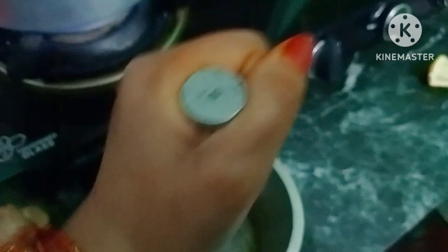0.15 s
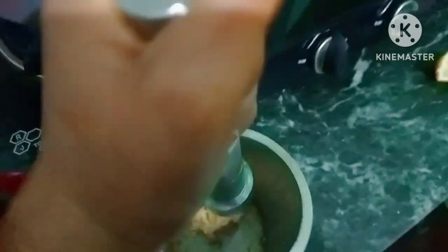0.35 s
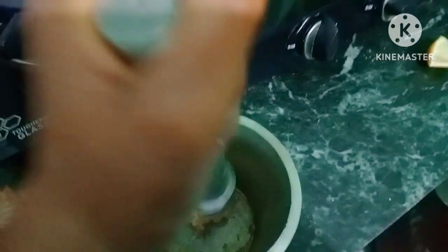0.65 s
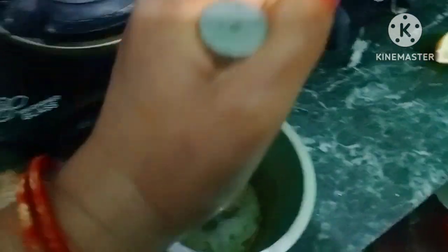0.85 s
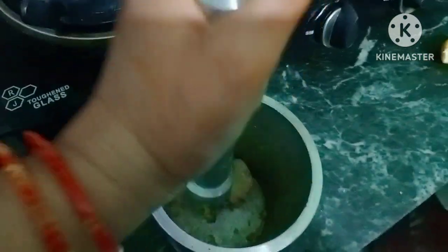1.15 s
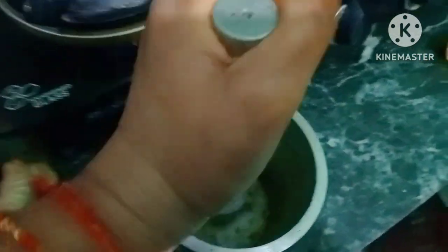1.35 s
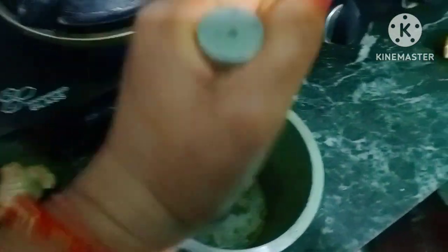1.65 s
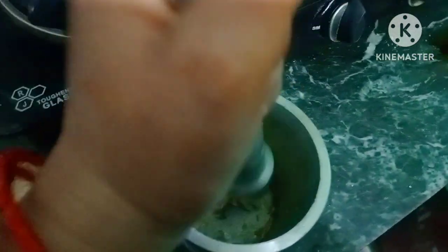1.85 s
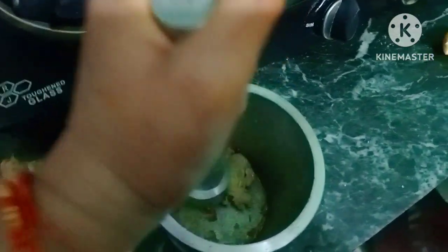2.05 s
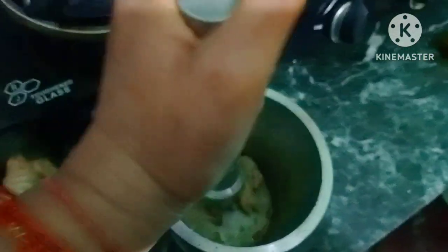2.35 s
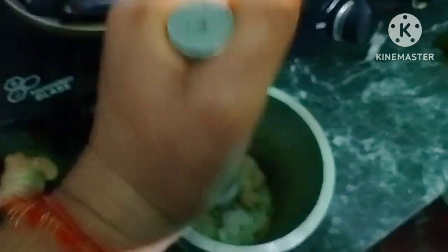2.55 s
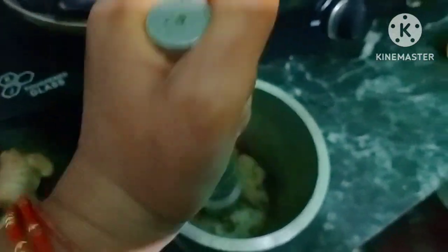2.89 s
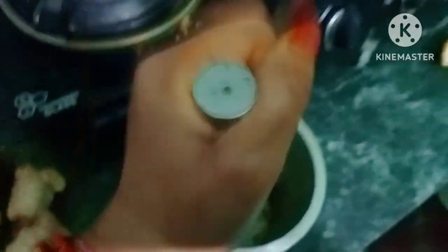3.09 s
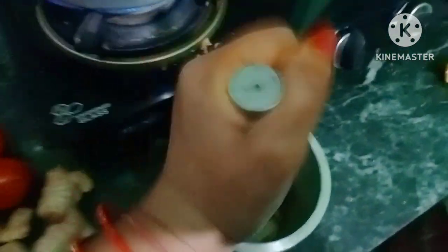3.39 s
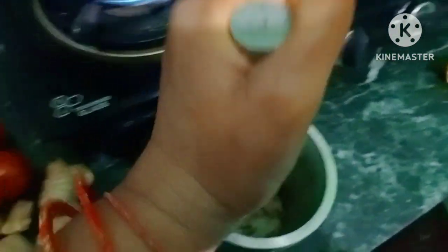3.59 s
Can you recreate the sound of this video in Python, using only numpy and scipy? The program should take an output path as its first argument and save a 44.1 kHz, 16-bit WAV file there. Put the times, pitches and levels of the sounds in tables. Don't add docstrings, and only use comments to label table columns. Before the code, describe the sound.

A metal pestle pounds ginger in a metal mortar on a stone counter, evenly about three times a second; the first blows are heaviest, later ones sharper. Glass bangles clink; small hard kitchen, close phone microphone.

```python
import sys
import numpy as np
from scipy import signal
from scipy.io import wavfile
from scipy.ndimage import uniform_filter1d

SR = 44100
rng = np.random.default_rng(int(sys.argv[2]) if len(sys.argv) > 2 else 0)


def voltage_ratio(level):
    return 10 ** (np.asarray(level, float) / 20)


def to_wav(sig):
    pcm = np.clip(np.atleast_2d(sig), -1, 1) * 32767
    pcm = np.round(pcm).astype(np.int16)
    wavfile.write(sys.argv[1], SR, pcm.T)


N = 165375
PAD = 8820
TOTAL = N + PAD

# f/Hz, density/dB
AIR_COLOUR = [(50, -3.5), (80, 8), (130, -0.5), (200, 0.5), (300, 6.5), (2000, -6), (5000, -18),
              (16000, -24.5)]
# middle/dB, upper/dB, lowest modes/dB
CLINKS = [(0.0024, -32, -40.5, -52, -56), (0.0295, -38, -51, -58, -64), (0.054, -39, -50, -62.5, -56),
          (0.253, 2, -15.5, -17.5, -31.5), (0.2893, -26, -32, -43.5, -37), (0.4034, -24, -38, -36, -39),
          (0.5263, -20, -17.5, -35, -38), (0.559, -24, -51, -51, -37), (0.7062, -47, -57, -71, -57),
          (0.7674, -17, -43, -44, -47), (0.849, -37, -44, -49, -54), (1.05, -34, -49, -58, -49),
          (1.061, -28, -27.5, -34.5, -51), (1.455, -36, -42, -51, -44), (1.735, -34, -34, -48, -42),
          (1.753, -31, -39.5, -50, -43), (1.7938, -40, -44.5, -67, -37), (2.0335, -38, -43, -56, -48),
          (2.2163, -21, -30.5, -38, -53), (2.2657, -32, -42, -64, -69), (2.528, -36, -44.5, -62, -64),
          (2.6413, -29, -38, -40, -44), (2.9471, -34, -46.5, -50, -48), (3.032, -27, -33, -39, -60)]
# lower mode/dB, upper modes/dB, then share of the free ringing length for both
NARROW_RING = [(-61, -57.5, .9), (-60.5, -64, .9), (-51, -53, 0.81), (-32, -24.5, 1), (-48.5, -52.5, 0.74),
               (-35.5, -51, 0.92), (-37, -46, 0.67), (-30, -41, 1), (-56, -64, 0.97), (-45, -57, 0.88),
               (-49, -60, 0.62), (-40.5, -52, .9), (-43, -51, 0.42), (-37.5, -63, 0.55), (-56, -64, 1),
               (-51, -54.5, 1), (-58, -70, 1), (-43, -63, 0.76), (-39.5, -48, 1), (-60, -69, .9),
               (-48.5, -72, 0.71), (-66, -58, .9), (-50, -58, 0.98), (-52, -47, 0.42)]
WIDE_BANGLE_HZ = [4440, 4592, 8505, 8538, 8724, 13580, 13665]
# level/dB, time to fall 60 dB/s
WIDE_BANGLE = [(3.5, 0.2), (3, 0.15), (-2, 0.095), (-4, 0.074), (-17, 0.062), (-15, 0.08), (4, 0.075)]
NARROW_BANGLE_HZ = [7296, 11710, 11745]
# level/dB, time to fall 60 dB/s
NARROW_BANGLE = [(1.5, 0.12), (-1.5, 0.077), (-17, 0.1)]
# t/s, length/s, f/Hz, width/Hz, level/dB
RUBS = [
    (1.757, 0.29, 620, 464, -43.5),
    (2.139, 0.22, 800, 79.5, -46),
    (2.147, 0.24, 363, 248, -45),
    (2.205, 0.12, 1050, 30, -48.5),
    (2.617, 0.19, 2070, 25, -37),
    (2.97, 0.18, 1865, 24.5, -42),
    (3.284, 0.0036, 5000, 3000, -42),
    (3.439, .13, 4576, 24.8, -47.5),
    (3.5, 0.095, 1880, 30, -37),
]
# t/s, time to fall 60 dB/s, f/Hz, width/Hz, level/dB
AFTER_RINGS = [(.203, 0.55, 931, 40, -29.5), (.403, 0.095, 3835, 40, -44), (.512, 0.54, 1250, 70, -26),
               (.79, 0.21, 1250, 70, -23), (.793, 0.28, 8000, 1500, -41.5), (1.095, .45, 2060, 55, -29.5),
               (1.097, .25, 2300, 90, -26), (1.095, .45, 2870, 130, -35), (1.1, 0.36, 3800, 300, -38.5),
               (1.397, 0.45, 4140, 2000, -34.5), (1.712, 0.57, 4020, 2180, -33.5),
               (2.92, 0.21, 4300, 90, -35), (3.18, 0.44, 5600, 40, -47), (3.18, 0.22, 4600, 30, -56),
               (3.447, 0.36, 7950, 90, -52.5), (.205, 0.32, 1030, 216, -43), (.512, .3, 5200, 80, -41),
               (2.015, 0.29, 2890, 682, -29), (2.316, .3, 2050, 55.6, -36), (2.914, 0.4, 83, 37.04, -30),
               (3.18, 0.38, 144, 24, -25.5), (3.18, .3, 1898, 40, -34)]
# f/Hz, density/dB
TAIL_COLOUR = [(200, -5), (250, -7.5), (400, -4), (800, -7), (2000, -15.5), (4500, -30), (8000, -30),
               (16000, -31)]
# f/Hz, time to fall 60 dB/s
ROOM_T60 = [(200, 0.43), (600, 0.52), (2000, 0.54), (5000, 0.45), (7000, 0.38), (15000, 0.12)]
SPRAY_DB = [-0.5, 1.3, 0, 2.3, 0.8, -6.5, -3.5, 0, 1, 1.5, 4.5, 3.5, 0.5, 0.8]
# f/Hz, level/dB, time to fall 60 dB/s
COUNTER = [(80.8, -13, 0.69), (110.1, -8, 0.44), (127.6, -6, 0.63), (146.9, 1.5, 0.4), (186.3, 0.5, 0.56),
           (201.5, -4.5, 0.67), (277, -8, 0.42), (318, -2.5, 0.39), (358, -6, 0.37), (417, -11, 0.45)]
# f/Hz, level/dB, time to fall 60 dB/s
MORTAR = [(620, -9.5, 0.33), (717, 1, 0.081), (780, 7, 0.032), (949, -8, 0.24), (1038, -4, 0.14),
          (1270, -2, 0.18), (1585, -3, .12), (1880, -7, 0.29), (2030, -7, 0.25), (2157, -0.5, 0.052)]
# multiple of snap pitch, level/dB, time to fall 60 dB/s
SNAP = [(.64, -8.5, 0.026), (.85, -23, 0.015), (1.0, -0.5, 0.018), (1.12, 1, 0.0041)]
# f/Hz, density/dB
SQUELCH_COLOUR = [(1760, -33), (3000, -30), (3520, -18), (4500, 7), (5600, -2.5), (8400, -8), (9940, -35),
                  (14300, 8), (16000, -30)]
# t/s, squelch/dB, snap/dB, knock/dB, thud/dB
BLOWS = [(0.1994, -6.5, -34, -8, -12), (0.5083, -3, -34.5, -9, -12), (0.7869, -6, -63, -19, -31),
         (1.0914, -3, -17.5, -22, -24.5), (1.3939, -13.5, -17.5, -26, -27),
         (1.709, -15, -14.5, -29.5, -27.5), (2.012, -7.5, -18.5, -25.5, -30.5),
         (2.3143, -7.5, -25, -21.5, -26), (2.6184, -6, -19, -18, -17.5), (2.9112, -11.5, -27, -22.5, -23.5),
         (3.1751, -14.5, -57.5, -21.5, -29), (3.444, -21, -25.5, -20.5, -32),
         (3.7454, -12, -38, -28, -25.5)]
# squelch/dB, snap/dB, knock/dB, thud/dB
EARLIER_BLOW = (-30.5, -27, -20, -26.5)
# snap pitch f/Hz, snap echo/dB, knock tilt and thud tilt/dB per octave
LANDINGS = [(3100, -7.5, -4, -6.5), (3170, -19, 2, 3), (3350, 3, 2.5, 4), (4030, 12.5, -3, 0),
            (2780, -8.5, -5, -2), (4360, 0.5, -2, -4.5), (4590, 5.5, -7, -2), (2700, 2, -3.5, 1.5),
            (4470, 3.5, 6.5, -7), (4250, -2, 2, 2.5), (4020, 3, -3, 5.5), (3860, 16, -1.5, -5.5),
            (2420, -14.5, 2.5, 3.5), (4030, 22.5, -1, -3)]
# f/Hz, width/Hz, level/dB
MIC = [(1332, 378, -6), (5650, 1300, -9), (8270, 1300, 6), (10300, 1100, -5), (14000, 2400, -0.5)]

AIR_DB = -51.5
EARLIER_S = -0.1
SNAP_LAG_S, KNOCK_LAG_S, THUD_LAG_S = 0.00077, 0.00213, 0.00363
SNAP_DB, KNOCK_DB, THUD_DB, BANGLE_DB = 10, -5, -3.5, -0.5
MODE_SPREAD_DB, DAMPING_SPREAD = 3.5, 0.14
TWIN_DB = -8
SQUELCH_RISE_S, SQUELCH_FALL_S, SQUELCH_LEAD_S = 0.0016, 0.0027, 0.0045
SQUELCH_DB, GRAIN_DB = -4.5, 5.5
CRACK_DB, CRACK_S = -6, 0.00031
CRUNCH_DB, CRUNCH_S, CRUNCH_PER_S = -3, 0.045, 5000
TAIL_DB, TAIL_RISE_S, TAIL_PATCHY_DB, SPRAY_GRAIN_DB = -10, 0.0029, 1.5, -1
SNAP_ECHO_DB, SNAP_ECHO_OCTAVES, SNAP_ECHO_TOP_HZ = 1.5, 0.8, 5200
TICK_DB, LOWEST_MODES_DB = -28, -6
BANGLE_ROOM_DB, BANGLE_ROOM_T60_S = -9.5, 0.32
MIC_LOW_CUT_HZ = 46.6
DUCK_FROM_DB, DUCK_SHARE, DUCK_RELEASE_DB_S = -30, 0.28, 38
DUCK_AHEAD_S, DUCK_SMOOTH_S = 0.016, 0.004
CLIP_TOP, CUTOFF_HZ = 0.84, 16800
STEADY_TOP_HZ, ATTACK_FROM_DB = 15850, -24


def rms_one(x):
    return x / np.sqrt(np.mean(x ** 2) + 1e-20)


def at_hz(points, hz):
    table = np.array(points)
    return np.interp(np.log(hz), np.log(table[:, 0]), table[:, 1])


def clicks(s, gains):
    out = np.full(TOTAL, 1e-18)
    places = (np.asarray(s) * SR).astype(int) + PAD
    np.add.at(out, np.clip(places, 0, TOTAL - 1), gains)
    return out


def fade(x, seconds):
    return signal.lfilter([1], [1, -np.exp(-1 / (seconds * SR))], x)


def band_pass(x, order, low_hz, high_hz):
    return signal.sosfilt(signal.butter(order, [low_hz, high_hz], "band", fs=SR, output="sos"), x)


def resonance(order, hz, width_hz):
    half = width_hz / 2
    return rms_one(band_pass(rng.standard_normal(TOTAL), order, hz - half, hz + half))


def bands(low_hz, count):
    white = rng.standard_normal((2, TOTAL))
    edges = np.geomspace(low_hz, 16500, count + 1)
    return [(np.sqrt(low * high), band_pass(white[k % 2], 2, low, high))
            for k, (low, high) in enumerate(zip(edges, edges[1:]))]


def drift(step):
    count = TOTAL // 100
    return np.interp(np.arange(TOTAL) / step, np.arange(count), rng.standard_normal(count))


def strike(modes, s, db, spread_db, wander, beat_hz, tilt_db=0, pitch=1, length=1):
    hz, level_db, t60 = np.transpose(modes)
    octaves = np.log2(hz / hz.mean())
    out = np.zeros(TOTAL + SR)
    t = np.arange(SR // 2)[:, None] / SR
    luck = np.clip(rng.standard_normal((len(s), 5, len(modes))), -2, 2)
    hits = zip(s, db, tilt_db + 0 * s, pitch + 0 * s, length + 0 * s, luck)
    for at, hit_db, tilt, scale, share, chance in hits:
        strength, sign, detune, damping, beat = chance
        gain = voltage_ratio(hit_db + level_db + spread_db * strength + tilt * octaves) * np.sign(sign)
        decay = share * t60 * np.exp(DAMPING_SPREAD * damping)
        span = t[:int(min(decay.max(), 0.5) * SR)]
        turn = 2 * np.pi * hz * scale * (1 + wander * detune) * span
        offset_hz = beat_hz * (np.sign(beat) / 2 + beat / 2)
        twin = voltage_ratio(TWIN_DB) * np.sin(turn + 2 * np.pi * offset_hz * span)
        i = int(at * SR) + PAD
        out[i:i + len(span)] += (voltage_ratio(-60 * span / decay) * (np.sin(turn) + twin)) @ gain
    return out[:TOTAL]


def kitchen_air():
    air = sum(voltage_ratio(at_hz(AIR_COLOUR, hz)) * noise for hz, noise in bands(52.4, count=18))
    return voltage_ratio(AIR_DB) * rms_one(air)


def bangles():
    s, tick_db, middle_db, upper_db, lowest_db = np.transpose(CLINKS)
    lower_db, top_db, length = np.transpose(NARROW_RING)
    wide = np.c_[WIDE_BANGLE_HZ, WIDE_BANGLE]
    narrow = np.c_[NARROW_BANGLE_HZ, NARROW_BANGLE]
    groups = [(wide[:2], lowest_db + LOWEST_MODES_DB), (wide[2:5], middle_db), (wide[5:], upper_db),
              (narrow[:1], lower_db), (narrow[1:], top_db)]
    length = np.clip(length, 0.2, 3)
    rings = sum(strike(modes, s, db + BANGLE_DB, spread_db=0, wander=0.00026, beat_hz=33, length=length)
                for modes, db in groups)
    hiss = np.diff(rng.standard_normal(TOTAL + 1))
    tick = voltage_ratio(TICK_DB) * fade(clicks(s, voltage_ratio(tick_db)), 0.0005) * hiss
    t = np.arange(SR // 3) / SR
    echo = rng.standard_normal(len(t)) * voltage_ratio(-60 * t / BANGLE_ROOM_T60_S) / 30
    clink = rings + tick
    return clink + voltage_ratio(BANGLE_ROOM_DB) * signal.fftconvolve(clink, echo)[:TOTAL]


def rubbing():
    out, t = 0, (np.arange(TOTAL) - PAD) / SR
    for s, length, hz, width_hz, db in RUBS:
        progress = np.clip((t - s) / length, 0, 1)
        out = out + voltage_ratio(db) * resonance(1, hz, width_hz) * np.sin(np.pi * progress ** 0.34)
    return out


def after_rings():
    out = 0
    for s, t60, hz, width_hz, db in AFTER_RINGS:
        out = out + resonance(2, hz, width_hz) * fade(clicks([s], voltage_ratio(db)), t60 / np.log(1000))
    return out


def room_tail(s, squelch_db, snap_db, knock_db, thud_db, snap_hz, knock_tilt, thud_tilt):
    parts = np.transpose([thud_db + thud_tilt, knock_db - knock_tilt, knock_db + knock_tilt,
                          knock_db, squelch_db + SPRAY_DB])
    parts = parts - parts.mean(axis=0)
    parts_hz = np.log([300, 700, 2000, 4000, 8000])
    snap_power = voltage_ratio(2 * (snap_db - snap_db.mean() + SNAP_ECHO_DB))
    out, grit_db = 0, SPRAY_GRAIN_DB * drift(100.0)
    for hz, noise in bands(209.4, count=22):
        db = np.array([np.interp(np.log(hz), parts_hz, row) for row in parts])
        nearness = np.exp(-(np.log2(hz / snap_hz) / SNAP_ECHO_OCTAVES) ** 2)
        snap = snap_power * nearness / (1 + (hz / SNAP_ECHO_TOP_HZ) ** 20)
        start = clicks(s, voltage_ratio(2 * db) + snap)
        power = fade(start, at_hz(ROOM_T60, hz) / np.log(1e6)) - fade(start, TAIL_RISE_S)
        colour_db = at_hz(TAIL_COLOUR, hz) + TAIL_PATCHY_DB * drift(440.0) + grit_db * (hz > 3000)
        out = out + voltage_ratio(colour_db) * np.sqrt(np.maximum(power, 0)) * noise
    return voltage_ratio(TAIL_DB) * out


def counter_thud(s, db, tilt):
    return strike(COUNTER, s + THUD_LAG_S, db + THUD_DB, MODE_SPREAD_DB, wander=0.0091, beat_hz=13.5, tilt_db=tilt)


def mortar_knock(s, db, tilt):
    return strike(MORTAR, s + KNOCK_LAG_S, db + KNOCK_DB, MODE_SPREAD_DB, wander=0.014, beat_hz=16, tilt_db=tilt)


def pestle_snap(s, db, snap_hz):
    return strike(SNAP, s + SNAP_LAG_S, db + SNAP_DB, spread_db=2.5, wander=0.0063, beat_hz=450, pitch=snap_hz)


def crunch(s, knock_db):
    grains = (rng.random(TOTAL) < CRUNCH_PER_S / SR) * rng.standard_normal(TOTAL)
    coloured = rms_one(band_pass(grains, 4, 280, 2400))
    start = clicks(s, voltage_ratio(knock_db))
    return voltage_ratio(CRUNCH_DB) * coloured * (fade(start, CRUNCH_S) - fade(start, KNOCK_LAG_S))


def squelch(s, db):
    fizz = rms_one(sum(voltage_ratio(at_hz(SQUELCH_COLOUR, hz)) * noise for hz, noise in bands(3034, count=8)))
    grain = voltage_ratio(GRAIN_DB * np.repeat(rng.standard_normal(N // 10), 20)[:TOTAL])
    burst = fade(clicks(s - SQUELCH_RISE_S, voltage_ratio(db)), SQUELCH_FALL_S)
    burst = fade(burst, SQUELCH_RISE_S) / (SQUELCH_RISE_S * SR)
    lead = fade(clicks(s - SQUELCH_LEAD_S, voltage_ratio(db - 36.5)), SQUELCH_LEAD_S)
    crack = voltage_ratio(CRACK_DB) * fizz * fade(clicks(s + SNAP_LAG_S, voltage_ratio(db)), CRACK_S)
    return voltage_ratio(SQUELCH_DB) * fizz * grain * (burst + lead) + crack


def pounding():
    s, squelch_db, snap_db, knock_db, thud_db = np.transpose([(EARLIER_S, *EARLIER_BLOW), *BLOWS])
    snap_hz, echo_db, knock_tilt, thud_tilt = np.transpose(LANDINGS)
    pulp = squelch(s, squelch_db) + crunch(s, knock_db)
    tip = pestle_snap(s, snap_db, snap_hz)
    stone = counter_thud(s, thud_db, thud_tilt)
    bowl = mortar_knock(s, knock_db, knock_tilt)
    room = room_tail(s, squelch_db, snap_db + echo_db, knock_db, thud_db, snap_hz, knock_tilt, thud_tilt)
    return pulp + tip + stone + bowl + room


def scene():
    mix = pounding() + rubbing() + after_rings() + bangles() + kitchen_air()
    return mix[None, PAD:]


def microphone(x):
    x = signal.sosfilt(signal.butter(3, MIC_LOW_CUT_HZ, "high", fs=SR, output="sos"), x)
    for hz, width_hz, db in MIC:
        a, k, c = voltage_ratio(db / 2), np.pi * width_hz / SR, -2 * np.cos(2 * np.pi * hz / SR)
        x = signal.lfilter([1 + k * a, c, 1 - k * a], [1 + k / a, c, 1 - k / a], x)
    return x


def gain_control(x, level):
    ramp = DUCK_RELEASE_DB_S * np.arange(N) / SR
    held = np.maximum.accumulate(level + ramp) - ramp
    over = np.maximum(held - DUCK_FROM_DB, 0)
    ahead = np.interp(np.arange(N) + DUCK_AHEAD_S * SR, np.arange(N), over)
    cut_db = fade(np.maximum(ahead, over), DUCK_SMOOTH_S) / (DUCK_SMOOTH_S * SR)
    return x * voltage_ratio(4 - DUCK_SHARE * cut_db)


def open_top(x, level):
    steady = signal.sosfiltfilt(signal.cheby2(16, 35, STEADY_TOP_HZ, fs=SR, output="sos"), x)
    rise = level - uniform_filter1d(level, size=1323)
    sharp = (level > ATTACK_FROM_DB) & (rise > 8.0)
    attack = uniform_filter1d(1.0 * sharp, size=441) * 10
    return steady + (x - steady) * np.minimum(attack, 1)


def low_pass(x):
    return signal.sosfilt(signal.butter(12, 16640, fs=SR, output="sos"), x)


def record(dry):
    dry = microphone(dry)
    level = 10 * np.log10(uniform_filter1d(dry[0] ** 2, size=88) + 1e-12)
    x = gain_control(dry, level)
    x = CLIP_TOP * np.tanh(x / CLIP_TOP)
    x = signal.sosfilt(signal.cheby2(10, 60, CUTOFF_HZ, fs=SR, output="sos"), x)
    x = open_top(x, level)
    x = signal.sosfilt(signal.butter(3, 56.0, "high", fs=SR, output="sos"), x)
    return low_pass(x)


dry = scene()
out = record(dry)
to_wav(out)
```